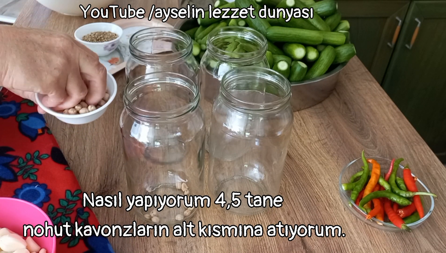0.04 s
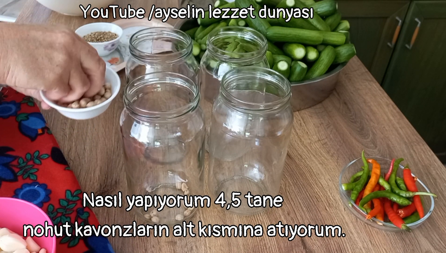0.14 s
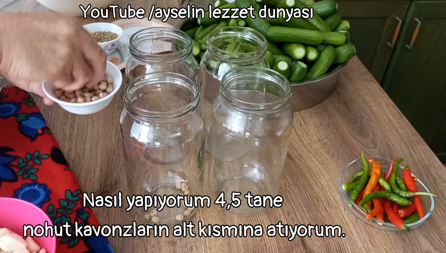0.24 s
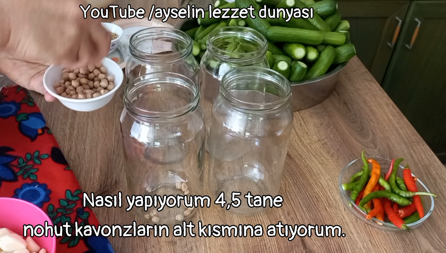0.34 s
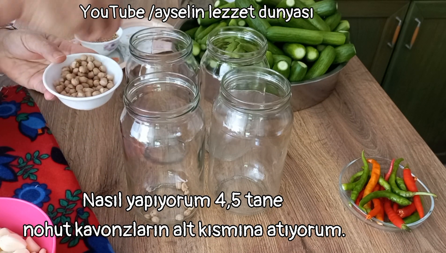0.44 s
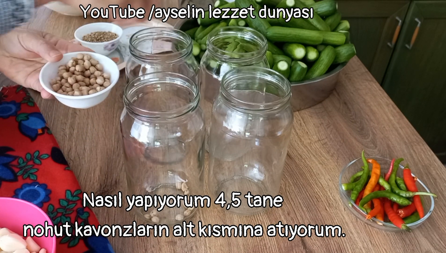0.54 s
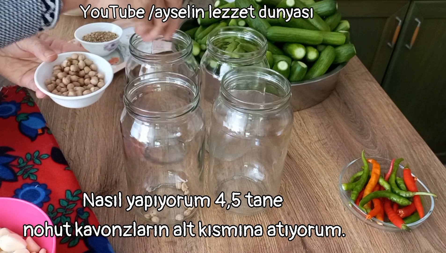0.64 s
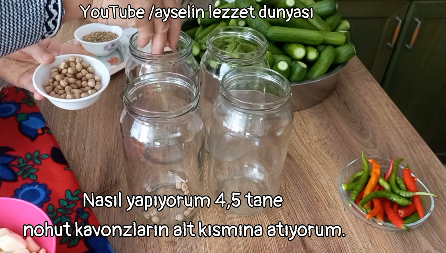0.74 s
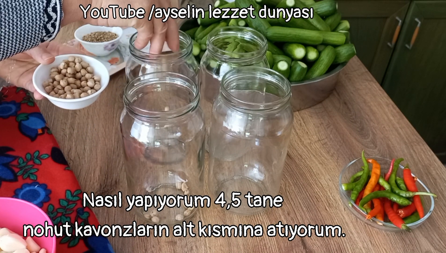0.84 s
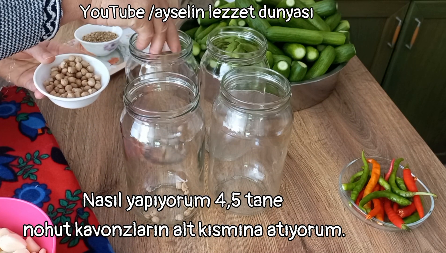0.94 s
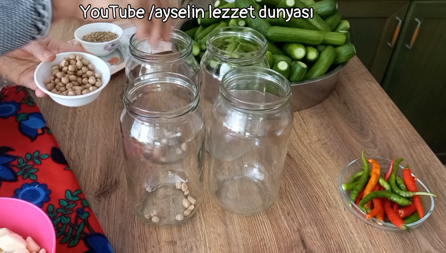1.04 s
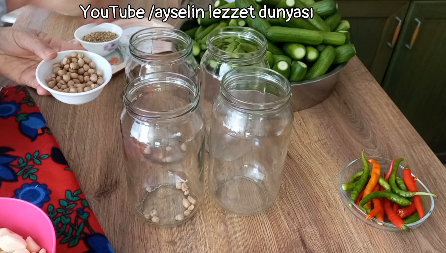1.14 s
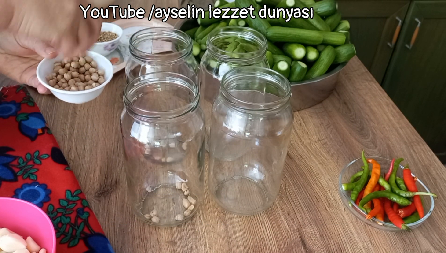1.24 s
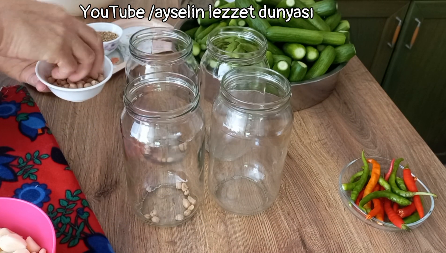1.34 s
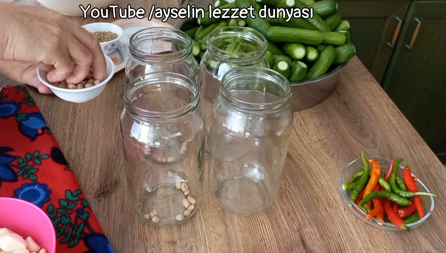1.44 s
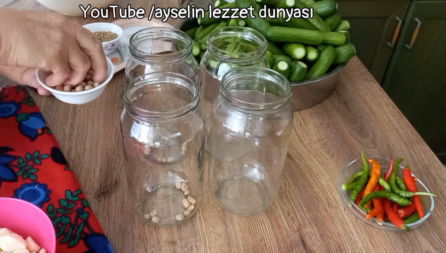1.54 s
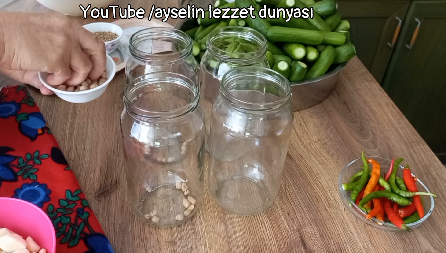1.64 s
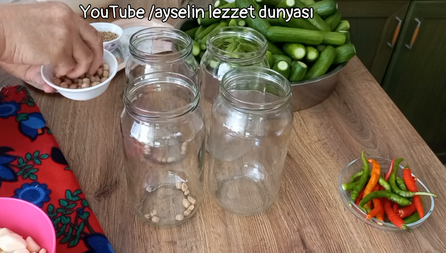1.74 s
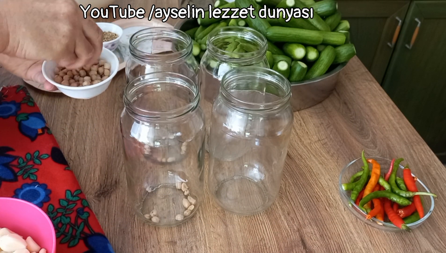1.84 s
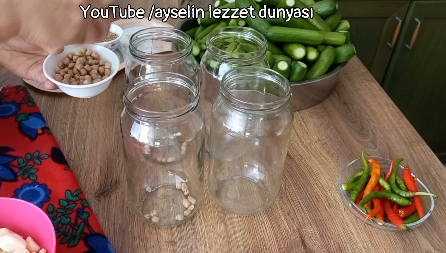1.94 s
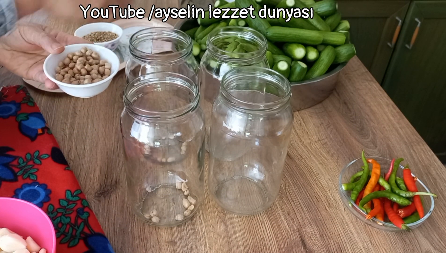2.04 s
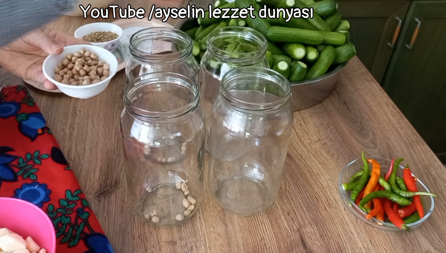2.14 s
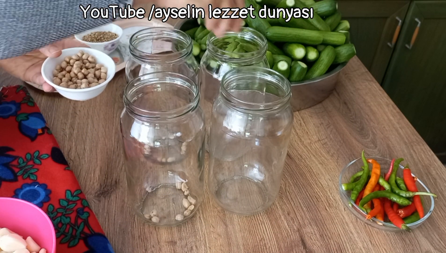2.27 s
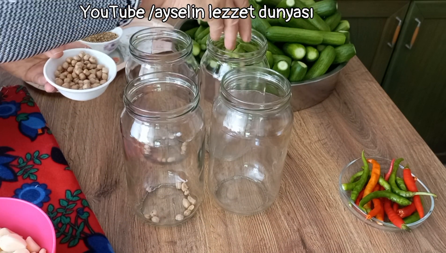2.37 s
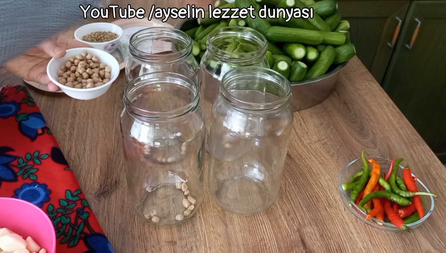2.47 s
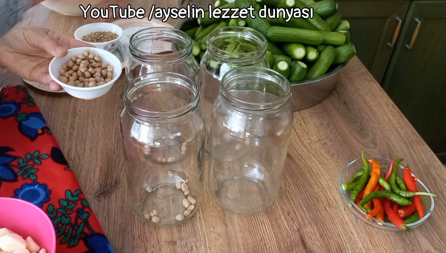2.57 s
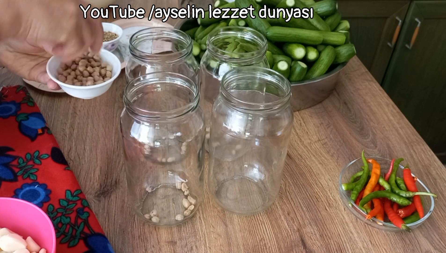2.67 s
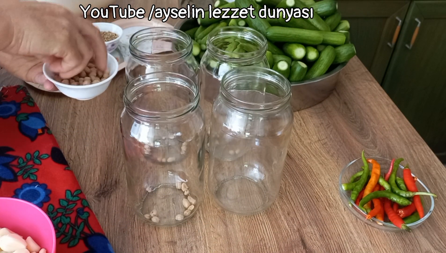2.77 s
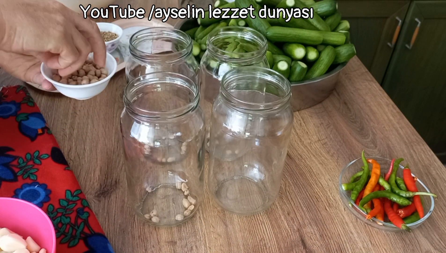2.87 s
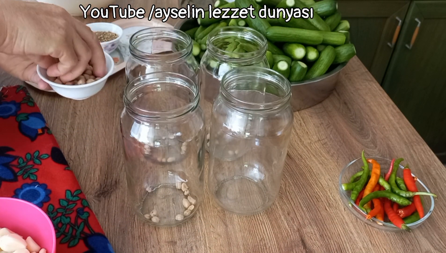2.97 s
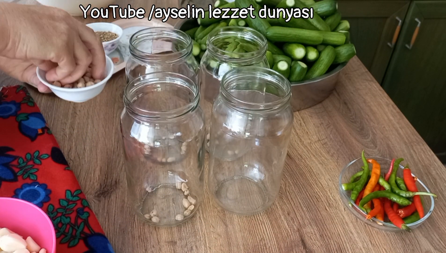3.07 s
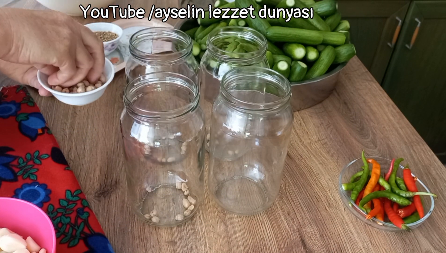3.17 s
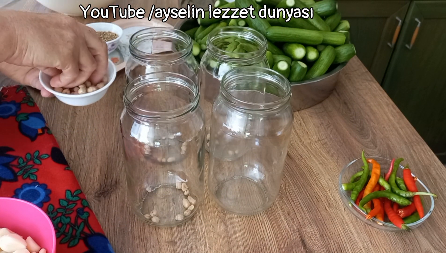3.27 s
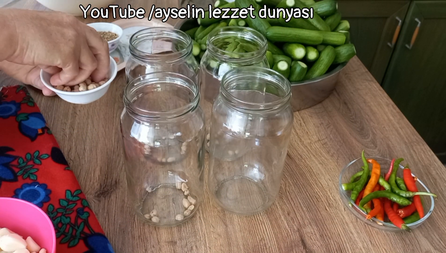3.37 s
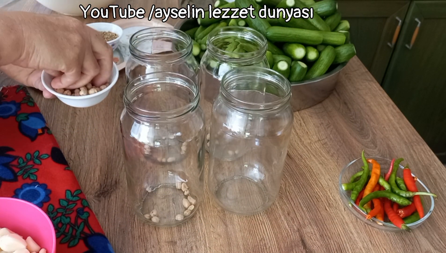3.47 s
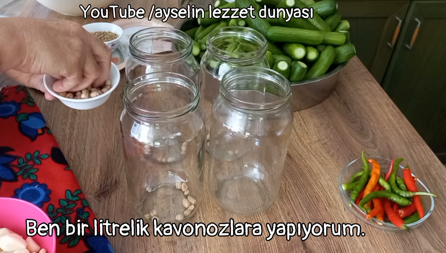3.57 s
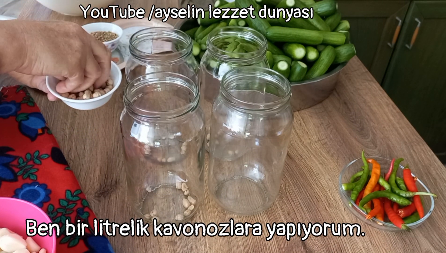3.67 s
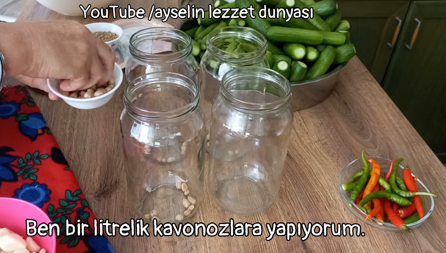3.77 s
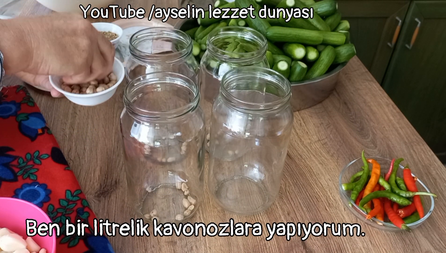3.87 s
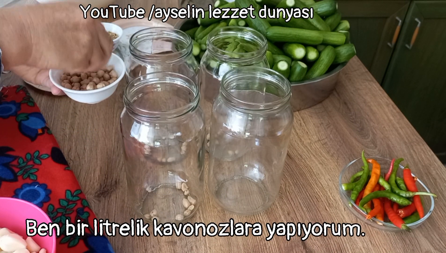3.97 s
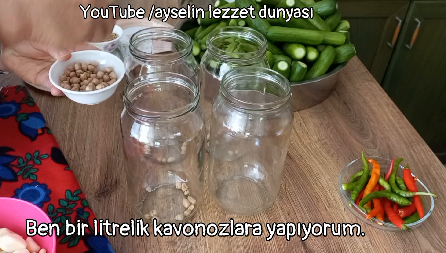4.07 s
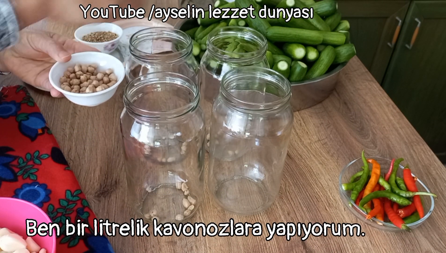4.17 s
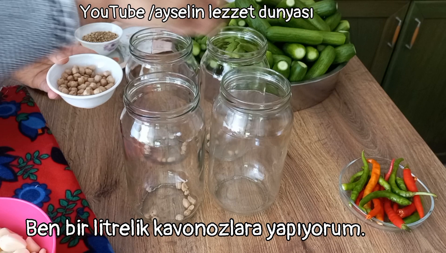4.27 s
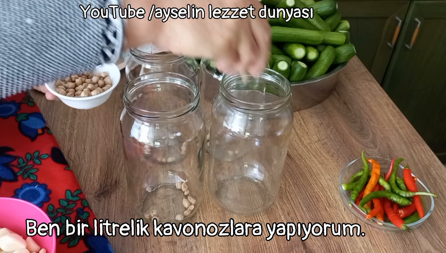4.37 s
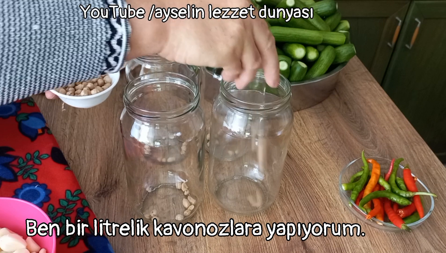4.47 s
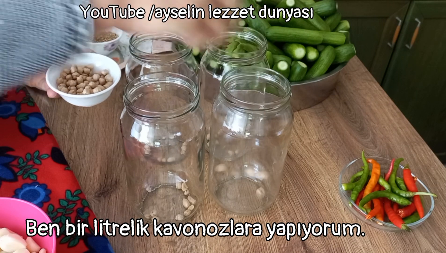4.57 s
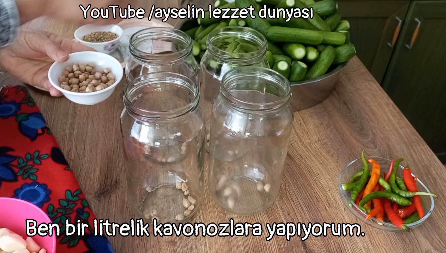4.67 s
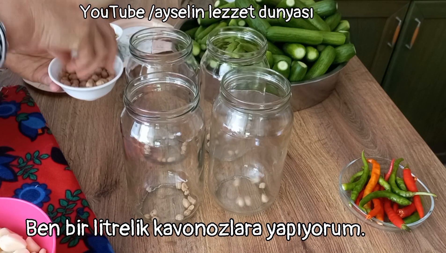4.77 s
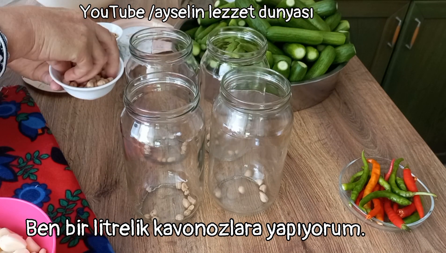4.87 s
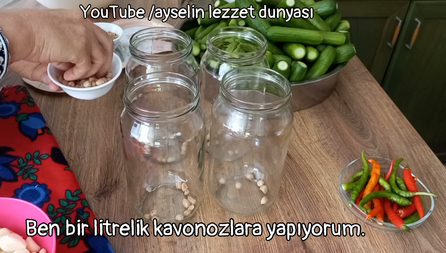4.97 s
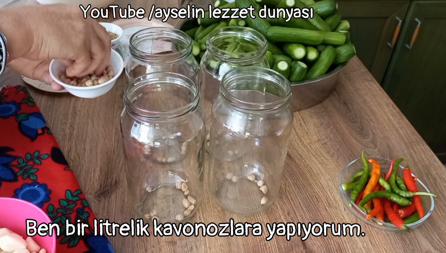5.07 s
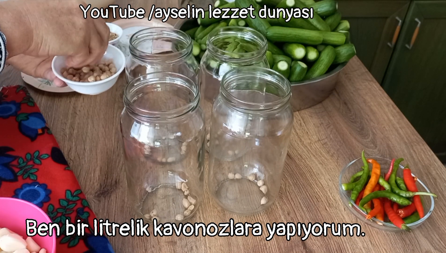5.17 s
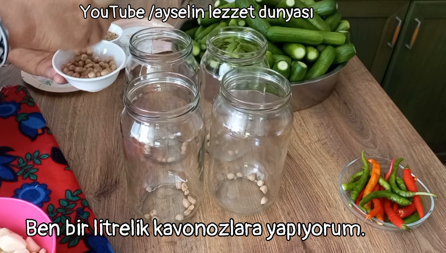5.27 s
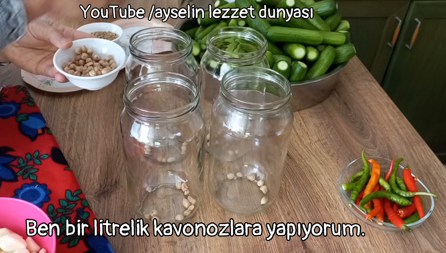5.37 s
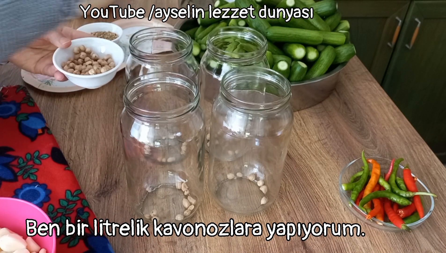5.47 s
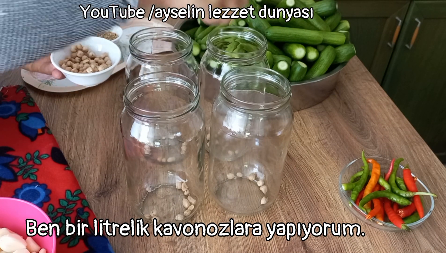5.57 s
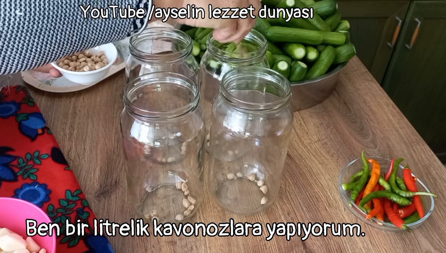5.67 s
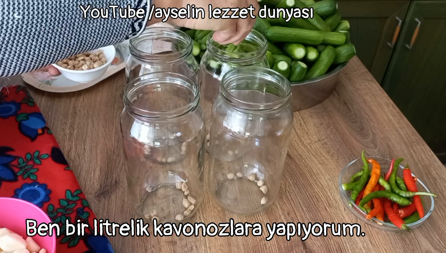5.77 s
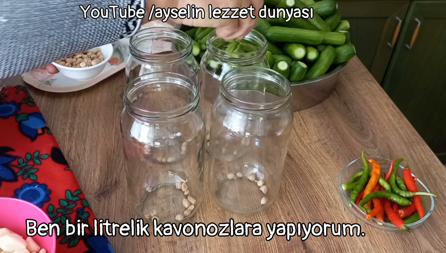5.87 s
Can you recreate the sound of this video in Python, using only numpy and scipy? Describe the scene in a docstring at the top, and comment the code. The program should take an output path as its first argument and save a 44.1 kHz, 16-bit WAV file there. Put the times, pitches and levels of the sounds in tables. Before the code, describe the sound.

Dried chickpeas drop in four small handfuls into empty glass jars, clinking and rattling brightly, between soft bowl stirring and bird chirps.

```python
"""Dried chickpeas dropped from a china bowl into empty glass jars on a wooden table: impacts drive decaying
glass modes, filtered-noise clacks, a table knock and the jar's air note; light bounces fade to rest.
Fingers stir the bowl (impulses and grains into damped china modes); a jar is nudged, a sleeve hisses by.
A small bird across the kitchen chirps in falling, warbling near-sines, mostly heard through the room.
Under it all, a faint steady rumble of coloured noise."""
import sys
import numpy as np
from scipy import signal
from scipy.fft import rfft, irfft, next_fast_len
from scipy.io import wavfile
from scipy.ndimage import uniform_filter1d

SR = 44100
rng = np.random.default_rng(int(sys.argv[2]) if len(sys.argv) > 2 else 0)


def generate_wav(signal):
    """Clip the signal to [-1, 1] and save it as 16-bit WAV at the path in sys.argv[1]."""
    frames = np.transpose(np.atleast_2d(signal))
    scaled = np.clip(frames, -1, 1) * 32767
    pcm = np.round(scaled).astype(np.int16)
    wavfile.write(sys.argv[1], SR, pcm)


N = 260631
TIME = np.arange(N) / SR
RING_TIME = TIME[:SR * 3 // 5]

# Handfuls let go over a jar: t/s, jar, time to rest/s, starting level of light bounces/dB
HANDFULS = [(0.898, "left", 0.69, -23), (2.484, "back", 0.37, -30.5), (4.61, "front", 0.63, -37.5),
            (5.855, "back", 0.33, -27)]
# Spectrum of a pea's dry clack: f/Hz, relative density/dB
CLACK_SPECTRUM = [(1200, -31), (2600, -22.5), (3500, -10), (5300, 0), (7500, -5.5), (8700, -2), (10000, -2),
                  (12500, -5.5), (15500, -2.5)]


def from_db(db):
    """Decibels to gain."""
    return 10 ** (np.asarray(db) / 20)


def rms_one(x):
    """Scale to unit power."""
    return x / np.sqrt(np.mean(x ** 2) + 1e-20)


def at_hz(points, hz):
    """Read a spectrum on a log-frequency axis."""
    point_hz, value = np.array(points).T
    return np.interp(np.log(hz + 1), np.log(point_hz), value)


def noise(spectrum, size):
    """Two unrelated channels of coloured noise with unit power."""
    padded = next_fast_len(size)
    hz = np.arange(padded // 2 + 1) * SR / padded
    white = rfft(rng.standard_normal((2, padded)))
    coloured = irfft(white * from_db(at_hz(spectrum, hz)), padded)
    return rms_one(coloured[:, :size])


def dying(t60):
    """Exponential decay, -60 dB at t60 seconds."""
    return from_db(-60 * RING_TIME / t60)


def mode(hz, t60, swell_s):
    """One ringing mode that swells in over its first moments; random phase per channel."""
    tone = np.sin(2 * np.pi * (hz * RING_TIME + rng.random((2, 1))))
    return tone * dying(t60) * (1 - np.exp(-RING_TIME / swell_s))


def burst(spectrum, t60, tail_db, tail_t60):
    """A short crack of noise and its faint after-ring."""
    envelope = dying(t60) + from_db(tail_db) * dying(tail_t60)
    return noise(spectrum, size=len(RING_TIME)) * envelope


def to_samples(times):
    """Seconds to sample indices, held within the scene."""
    return np.clip(np.round(np.asarray(times) * SR).astype(int), 0, N)


def clicks(times, db):
    """One impulse per contact."""
    out = np.zeros(N + 1)
    np.add.at(out, to_samples(times), from_db(db))
    return out[:N]


def grains(per_s, spread_db):
    """Tiny contacts of uneven strength and random sign at random moments."""
    present = rng.random(N) < per_s / SR
    sign = rng.choice([-1, 1], N)
    return present * sign * from_db(spread_db * np.clip(rng.standard_normal(N), -2, 2))


def swell(s, half_length_s, db):
    """Gain of a movement that swells and fades around one moment (Gaussian)."""
    return from_db(db) * np.exp(-((TIME - s) / half_length_s) ** 2)


def play(force, response):
    """Drive a response with a force by convolution."""
    return signal.oaconvolve(np.atleast_2d(force), np.asarray(response), axes=-1)[:, :N]


def kitchen(x, wet_db, t60):
    """Direct sound plus diffuse reflections that build up over the first milliseconds."""
    build_up = np.clip(RING_TIME / 0.0043, 0, 1)
    tail = rng.standard_normal((2, len(RING_TIME))) * dying(t60) * build_up
    unit_tail = tail / np.sqrt(np.sum(tail ** 2, axis=1, keepdims=True))
    return x + from_db(wet_db) * play(x, unit_tail)


def background():
    """Steady room rumble: mid and side noise mixed so the bass is alike on both sides."""
    # f/Hz, relative density/dB
    rumble_spectrum = [(15, -36.5), (25, -1), (200, -3), (242, -12), (489, -6), (840, -10), (1020, -13.5),
                       (1560, -19), (2110, -16), (4030, -23.5), (14400, -48), (16000, -55.5)]
    # f/Hz, left-right likeness (0 to 1)
    likeness = [(30, .55), (120, .75), (300, 0.68), (600, 0.35), (1200, 0.097), (4000, .05)]
    mid_side_db = -60.5   # of the mid and side noises, before mixing
    padded = next_fast_len(N)
    mid, side = rfft(noise(rumble_spectrum, size=padded))
    alike = np.clip(at_hz(likeness, np.arange(len(mid)) * SR / padded), -1, 1)
    stereo = np.sqrt(1 + alike) * mid + np.sqrt(1 - alike) * side * [[1], [-1]]
    return from_db(mid_side_db) * irfft(stereo, padded)[:, :N]


def notes(rows, zigzag, rough, flutter_db, zigzag_hz=38, warble_hz=310):
    """Falling near-sines with a pitch zigzag; uneven warble and level flutter set their raspiness."""
    attack_s, release_s, fade_db = 0.0089, 0.012, 3
    glide_curve = .8   # below 1: pitch falls fastest at first
    octave_db = -24   # weak second harmonic
    slow_noise = uniform_filter1d(rng.standard_normal((2, N)), size=70)
    wobble, flutter = rms_one(uniform_filter1d(slow_noise, size=30))
    out = np.zeros(N)
    for s, length, first_hz, last_hz, db in rows:
        on = (TIME >= s) & (TIME < s + length)
        t = TIME[on] - s
        glide = first_hz * (last_hz / first_hz) ** ((t / length) ** glide_curve)
        warble = np.sin(2 * np.pi * warble_hz * t) + .7 * wobble[on]
        pitch = glide * (1 - zigzag * np.cos(2 * np.pi * zigzag_hz * t) + rough * warble)
        phase = 2 * np.pi * np.cumsum(pitch) / SR
        edges = np.clip(np.minimum(t / attack_s, (length - t) / release_s), 0, 1)
        loudness = from_db(db - fade_db * t / length + flutter_db * flutter[on]) * edges
        out[on] += loudness * (np.sin(phase) + from_db(octave_db) * np.sin(2 * phase))
    return out


def bird():
    """Raspy chirps and thin smooth whistles, far enough away that the room outweighs the direct voice."""
    # t/s, length/s, glide start f/Hz, glide end f/Hz, level/dB
    chirp_rows = [(-.06, 0.084, 4700, 2670, -35.5), (.171, .11, 4800, 2933, -47),
                  (.32, 0.12, 4680, 2870, -52.5), (1.684, 0.14, 6120, 3260, -47),
                  (2.325, 0.11, 4530, 2940, -54), (2.964, 0.096, 4595, 2680, -39),
                  (3.616, 0.094, 4500, 2930, -55), (3.874, .11, 4900, 2915, -47),
                  (4.39, .1, 4620, 2960, -60.5), (4.56, 0.082, 4340, 2644, -36),
                  (5.263, 0.11, 5735, 2616, -35), (5.683, 0.098, 4620, 2920, -62)]
    # t/s, length/s, glide start f/Hz, glide end f/Hz, level/dB
    whistle_rows = [(3.09, 0.092, 2710, 2110, -60), (3.19, 0.14, 2700, 2530, -60.5)]
    chirps = notes(chirp_rows, zigzag=.09, rough=.035, flutter_db=3.5)
    whistles = notes(whistle_rows, zigzag=.002, rough=0.0048, flutter_db=0.0)
    panned = (chirps + whistles) * from_db([[1], [-1]])
    return kitchen(panned, wet_db=2.5, t60=0.42)


def bowl():
    """Peas click and stir against hand-damped china; a softly nudged jar wakes its low modes."""
    # Clicks under the fingers: t/s, level/dB
    bowl_clicks = [(0.19, -43.5), (0.291, -44), (.428, -47.5), (1.808, -40), (1.837, -53.5), (2.966, -45),
                   (3.162, -48), (3.38, -47), (3.401, -43.5), (3.537, -53), (3.654, -53), (3.72, -50),
                   (3.749, -46.5), (3.784, -37), (3.906, -38)]
    # Finger stirs: t of peak/s, half length/s, level/dB
    stir_rows = [(0.219, 0.09, -52.5), (1.723, 0.14, -49.5), (2.97, 0.1, -56), (3.396, 0.033, -70),
                 (3.633, 0.096, -59), (3.876, 0.11, -55.5), (5.036, 0.11, -49)]
    # Damped bowl: f/Hz, level/dB, t60/s
    bowl_modes = [(3650, -34, 0.011), (4990, -5.5, 0.0037), (4904, -0.5, 0.048), (5460, -5.5, 0.0089),
                  (8320, -0.5, 0.0075), (12270, -10, 0.02)]
    # Peas' own tick: f/Hz, relative density/dB
    tick_spectrum = [(1000, 1.5), (3000, 5.5), (5500, 5), (8000, -2.5), (10500, -6), (12800, -11),
                     (15500, -21)]
    # Jar nudges: t/s, level/dB
    nudge_rows = [(4.048, -38), (4.062, -39)]
    # Low jar modes: f/Hz, relative level/dB, t60/s
    nudge_modes = [(1902, 0, 0.18), (3385, 6.5, 0.13), (5280, -21, 0.26), (6010, -26, 0.097)]

    stirring = sum(swell(*row) for row in stir_rows) * grains(per_s=220, spread_db=5)
    force = clicks(*np.transpose(bowl_clicks)) + stirring
    china = sum(from_db(db) * mode(hz, t60, swell_s=0.00014) for hz, db, t60 in bowl_modes)
    tick = burst(tick_spectrum, t60=0.0086, tail_db=-20, tail_t60=0.12)
    stirred = play(force, china + tick) * from_db([[1], [-1]])

    ring = sum(from_db(db) * mode(hz, t60, swell_s=0.0026) for hz, db, t60 in nudge_modes)
    touch = burst(tick_spectrum, t60=0.037, tail_db=-8, tail_t60=0.26)
    nudge = play(clicks(*np.transpose(nudge_rows)), from_db(-4.5) * ring + from_db(-13.5) * touch)
    return kitchen(stirred + nudge, wet_db=-1, t60=0.17)


def handful(start, rest_s, first_db, count=16):
    """Rows (t/s, level/dB, spot): hard impacts, then light bounces fading and nearing the bottom."""
    # Hard impacts: t/s, strength/dB, spot (0 bottom, 1 wall)
    impact_rows = [(0.898, -16, 0.013), (0.929, -18, 0.17), (0.94, -19.5, 0.56), (0.975, -17, 0.12),
                   (1.018, -23, 1), (1.04, -21, 0.11), (1.057, -13, 0.15), (1.106, -19, 0.75),
                   (1.149, -17.5, 0.039), (1.155, -21, 0.028), (1.25, -26.5, 0.58), (1.307, -27.5, 0.24),
                   (1.42, -32, 0.12), (1.511, -41, 0.071), (2.485, -36, .1), (2.49, -16.5, .03),
                   (2.514, -15.5, 0.19), (2.539, -19, .02), (2.569, -26.5, 0.84), (2.599, -13, 0.56),
                   (2.612, -28, 0.29), (2.643, -25.5, .03), (2.693, -38, 0.027), (2.727, -27.5, .05),
                   (2.775, -33, 0.27), (2.91, -46.5, 0.062), (4.61, -30.5, 0.059), (4.644, -15.5, 0.11),
                   (4.652, -30, 0.84), (4.68, -27.5, 1), (4.766, -33, 1), (4.791, -25.5, .03),
                   (4.856, -26, 0.57), (4.877, -35, 0.039), (4.924, -30.5, 0.18), (4.95, -32.5, 0.084),
                   (5.014, -42, .3), (5.061, -40.5, 0.61), (5.208, -46, 0.04), (5.854, -26.5, 0.04),
                   (5.863, -23, 0.036), (5.888, -20.5, 0.14)]
    settle_loss_db, spread_db = 21, 3.5
    hard = [row for row in impact_rows if start - .1 < row[0] < start + 1]
    moment, size, spot = rng.random((count, 3)).T
    progress = (np.arange(count) + 1 + moment) / (count + 1)
    light_s = start + rest_s * progress
    light_db = first_db - settle_loss_db * progress + spread_db * (2 * size - 1)
    light = [light_s, light_db, spot * (1 - progress / 2)]
    return np.vstack([hard, np.transpose(light)])


def family_levels(hits):
    """Level/dB of each mode family per hit, from its strength and its spot."""
    # families: bottom drumming, bottom overtones, wall bending, dense top modes
    on_bottom_db, on_wall_db = [-4, -1.5, -24.5, -3.5], [-9, -19, 2.5, -10.5]
    wall = np.clip(hits[:, 2:], 0, 1)
    return hits[:, 1:2] + (1 - wall) * np.array(on_bottom_db) + wall * np.array(on_wall_db)


def glass(modes, hits, level_db, swell_s=0.0011, uneven_db=5.0, split=0.0013):
    """An imperfectly round jar: each mode is a close pair, its strength and balance random per hit."""
    # Base t60/s of each mode family, lengthened below for low modes
    base_t60_s = [0.13, 0.12, 0.1, 0.13]
    zone_edges_hz, family_of_zone = [5260, 6600, 8400, 10650], [2, 0, 2, 1, 3]
    long_ring_hz = 2070   # modes here, the lowest of the wall, ring twice the base t60

    times, family_db = hits[:, 0], family_levels(hits)
    hz, db = np.transpose(modes)
    family = np.take(family_of_zone, np.searchsorted(zone_edges_hz, hz))
    gap = split * rng.random(len(hz))
    angle = rng.uniform(0, 2 * np.pi, (len(times), len(hz)))
    uneven = uneven_db * rng.uniform(-1.1, 1.345, angle.shape)
    strength = from_db(family_db[:, family] + db + level_db + uneven)
    rings = 0
    for detune, share in ((1 - gap, np.cos(angle)), (1 + gap, np.sin(angle))):
        shapes = np.array([mode(f, base_t60_s[k] * (1 + (long_ring_hz / f) ** 4), swell_s)
                           for f, k in zip(hz * detune, family)])
        rings = rings + np.tensordot(strength * share, shapes, 1)
    out = np.zeros((2, N + len(RING_TIME)))
    for start, ring in zip(to_samples(times), rings):
        out[:, start:start + len(RING_TIME)] += ring
    return out[:, :N]


def ring_jars():
    """Each handful rings the modes of its own jar; returns the rings and all hits."""
    # Back left jar: f/Hz, relative level/dB
    left_modes = [(1895, -19.5), (2290, -27.5), (3391, -12), (4016, -9), (4996, -19), (5297, -17),
                  (5491, -2), (5525, -3.5), (6169, -22), (7321, -11), (7827, -10), (8753, -19), (9658, -5),
                  (9905, -5), (10250, -10.5), (11050, -19.5), (11994, -6.5), (12295, -14.5), (12392, -17.5),
                  (12489, -11), (12898, -13.5), (13523, -15), (14600, -14), (14901, -10), (15310, -9.5),
                  (15493, -17.5)]
    # Back right jar: f/Hz, relative level/dB
    back_modes = [(2067, -13), (2310, -29.5), (3348, -7), (4199, -5), (4996, -10.5), (5814, -2),
                  (6535, -19.5), (7483, 1.5), (7989, -9.5), (9539, -12), (9851, -1.5), (9959, -2.5),
                  (10067, -4), (10777, -17), (11208, -18.5), (11940, -13.5), (12285, -16), (12403, -9.5),
                  (12940, -13.5), (13372, -18), (13652, -16.5), (14632, -6.5), (14901, -15.5), (15084, -12)]
    # Front right jar: f/Hz, relative level/dB
    front_modes = [(2056, -10), (2340, -18), (3413, -4), (4081, -11), (4156, -8.5), (5233, -11.5),
                   (6051, -3), (6128, 3), (7720, -7), (7950, -11), (8678, -7.5), (9259, -16), (9593, -12),
                   (9776, -6.5), (10239, -3), (10541, 0.5), (11413, -9), (11811, -8.5), (11880, -6.5),
                   (12295, 2), (12554, -12), (12801, -15.5), (12909, -19), (13555, -15.5), (14298, -6.5),
                   (14879, -26), (15278, -2)]
    # modes, ring level/dB, left-right difference/dB
    jar_settings = {"left": (left_modes, 0.56, 0.6),
                    "back": (back_modes, -0.41, 0.6),
                    "front": (front_modes, -0.5, 0.36)}
    rings, drops = 0, []
    for start, jar, rest_s, first_db in HANDFULS:
        modes, ring_db, pan_db = jar_settings[jar]
        hits = handful(start, rest_s, first_db)
        rings = rings + glass(modes, hits, ring_db) * from_db([[pan_db / 2], [-pan_db / 2]])
        drops.append(hits)
    return rings, np.vstack(drops)


def contacts(hits, softening, rolling_db, settle_t60):
    """Force of the impacts, each followed by a dying patter of rolling peas."""
    db = 10 * np.log10(np.sum(from_db(family_levels(hits)) ** 2, axis=1))
    # softening below 1 narrows the range between light and hard hits
    force = clicks(hits[:, 0], db.max() + softening * (db - db.max()))
    motion = np.sqrt(np.abs(play(force ** 2, dying(settle_t60)[None] ** 2)[0]))
    return force + from_db(rolling_db) * motion * grains(per_s=170, spread_db=7)


def faint_modes(level_db, t60, count=44):
    """Many faint glass modes, jittered evenly in log frequency and coloured like the clack."""
    pitches = 2300 * (15500 / 2300) ** ((np.arange(count) + rng.random(count)) / count)
    total = 0
    for hz in pitches:
        gain = from_db(at_hz(CLACK_SPECTRUM, hz)) * np.sqrt(hz / pitches[-1])
        total = total + gain * mode(hz, t60, swell_s=0.0029)
    return from_db(level_db) * total


def pea_clack(hits):
    """Dry clack of the peas: a noise burst plus faint glass modes per contact."""
    sharp = contacts(hits, softening=0.93, rolling_db=-4.5, settle_t60=0.27)
    crack = burst(CLACK_SPECTRUM, t60=.012, tail_db=-18.5, tail_t60=0.12)
    return from_db(-13.0) * play(sharp, crack + faint_modes(level_db=-21, t60=0.15))


def table_knock(hits):
    """Knock in the table and hollow note of the jar's air, driven alike in both channels."""
    # f/Hz, relative density/dB
    knock_spectrum = [(130, -28), (240, 3), (370, 14), (550, -4.5), (1300, -2), (1900, -7), (3000, -33)]
    air_hz, air_db, air_t60_s = 388.9, -33.5, .13
    fall_spread_s, fall_db = 0.02, 0.5   # extra gain of first landings, from hand height
    # light bounces lose more treble than weight
    heavy = contacts(hits, softening=0.49, rolling_db=-8, settle_t60=0.49)
    thud = from_db(-30) * burst(knock_spectrum, t60=0.023, tail_db=-10.5, tail_t60=0.17)[0]
    air = from_db(air_db) * np.sin(2 * np.pi * air_hz * RING_TIME) * dying(air_t60_s)
    weight = 1 + sum(swell(start + fall_spread_s, fall_spread_s, fall_db) for start, *_ in HANDFULS)
    return play(heavy * weight, [thud + air])


def jars():
    """Ringing glass and clack in one room tail, the long waves of the knock in a longer one."""
    rings, hits = ring_jars()
    bright = rings + pea_clack(hits)
    body = kitchen(table_knock(hits), wet_db=-5.5, t60=0.53)
    return kitchen(bright, wet_db=-2.0, t60=0.38) + body


def sleeve():
    """A sleeve brushes past as the arm reaches for the front jar: a brief swell of cloth hiss."""
    # f/Hz, relative density/dB
    sleeve_spectrum = [(2000, -3), (6000, 11), (11000, -6.5), (13500, -22.5)]
    return swell(4.58, half_length_s=0.036, db=-48.5) * noise(sleeve_spectrum, size=N)


def scene():
    """Jars, bowl, sleeve, bird and room."""
    return jars() + bowl() + sleeve() + bird() + background()


def record(dry):
    """Steep elliptic low-pass."""
    cutoff_hz = 15600
    low_pass = signal.ellip(10, .3, 70, cutoff_hz, fs=SR, output="sos")
    return signal.sosfilt(low_pass, dry)


dry = scene()
out = record(dry)
generate_wav(out)
```